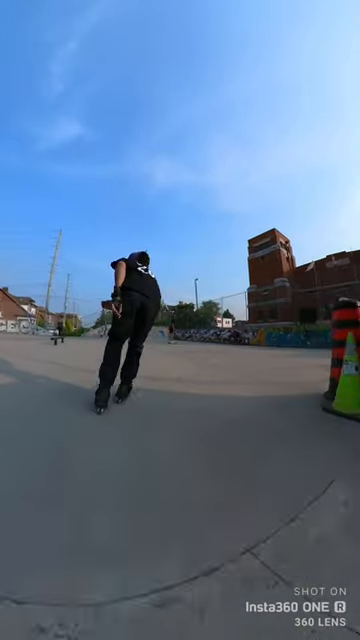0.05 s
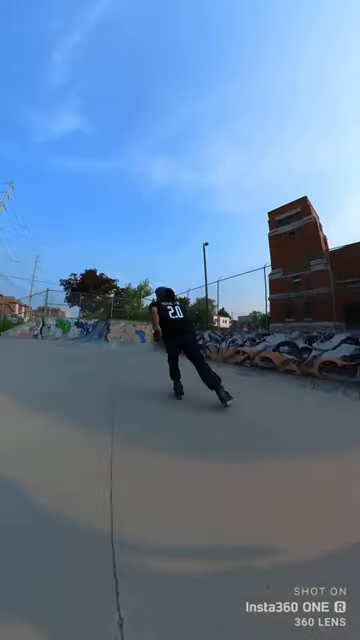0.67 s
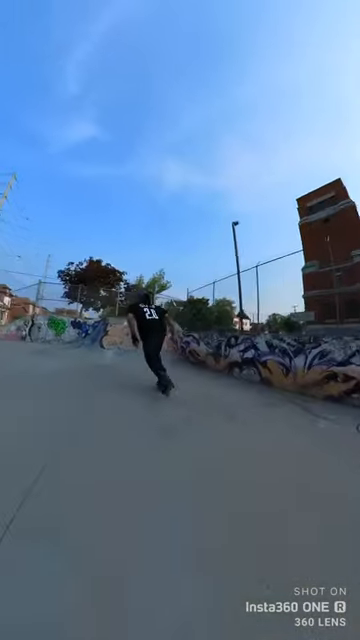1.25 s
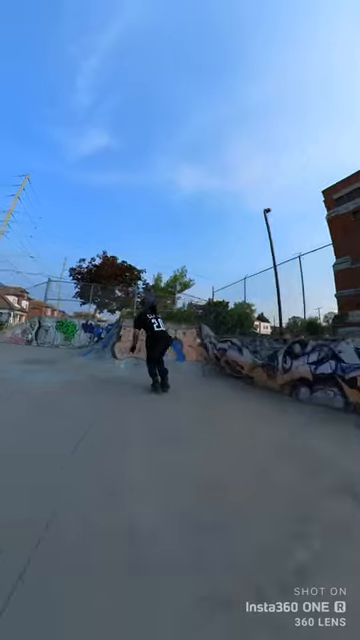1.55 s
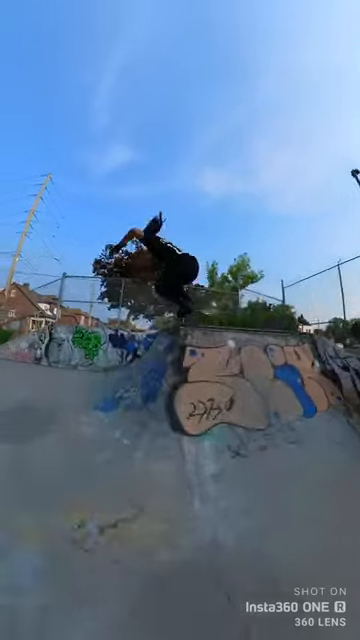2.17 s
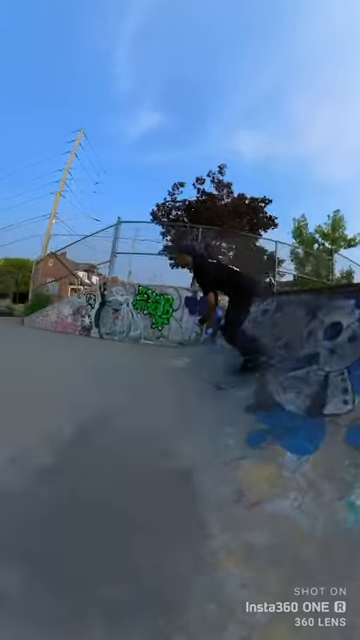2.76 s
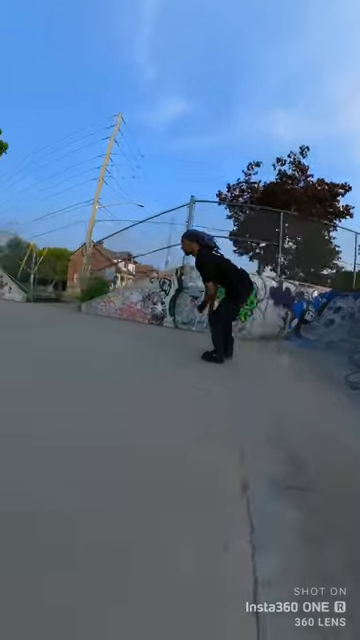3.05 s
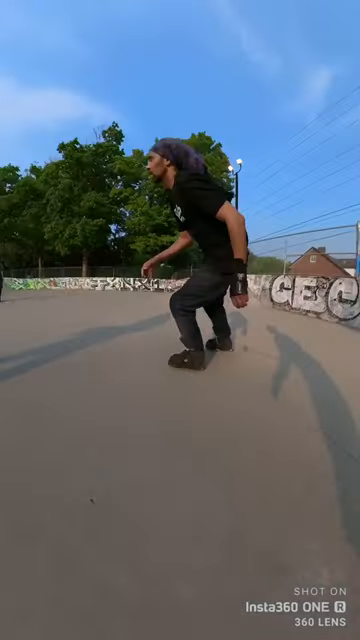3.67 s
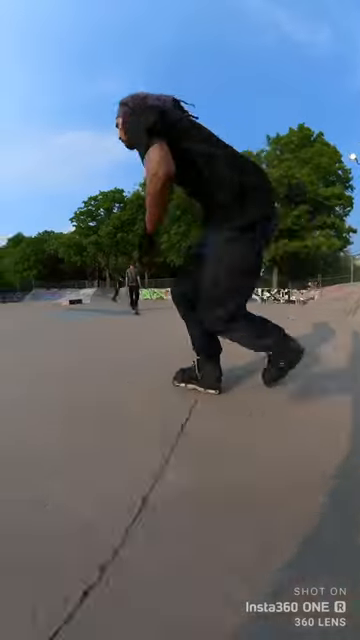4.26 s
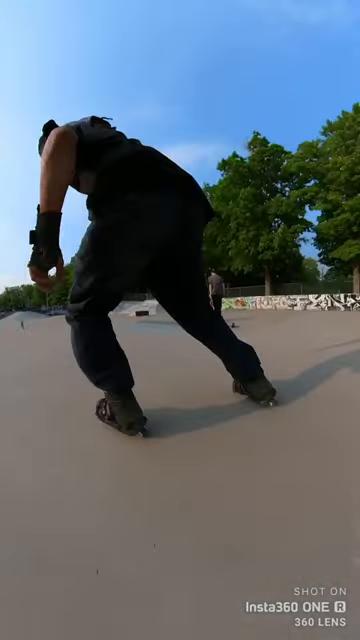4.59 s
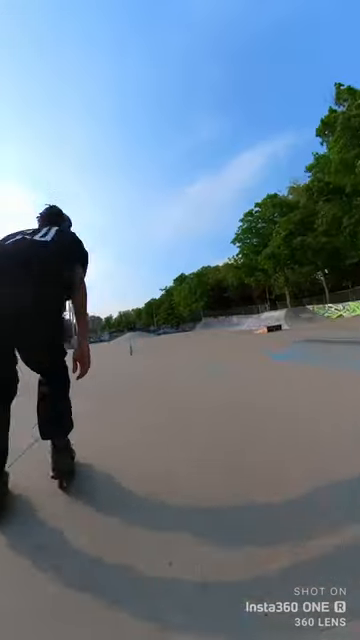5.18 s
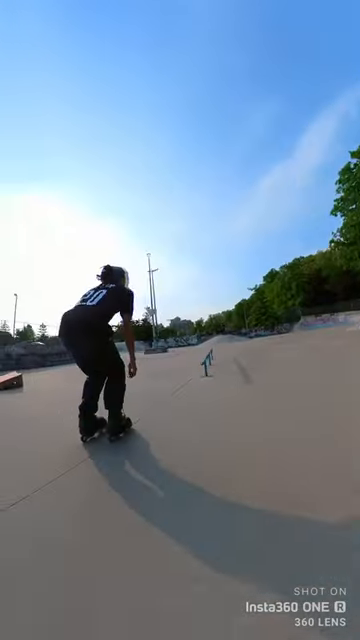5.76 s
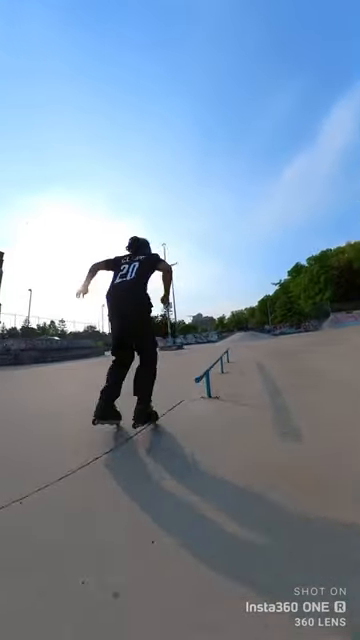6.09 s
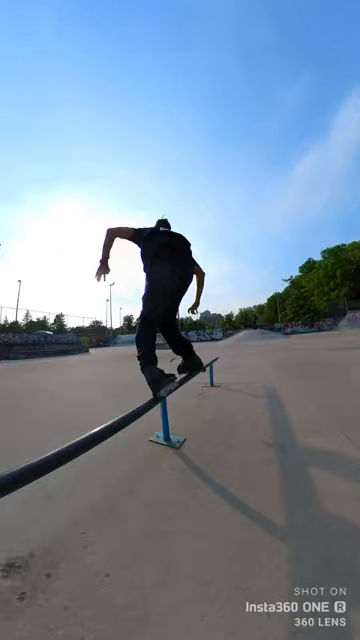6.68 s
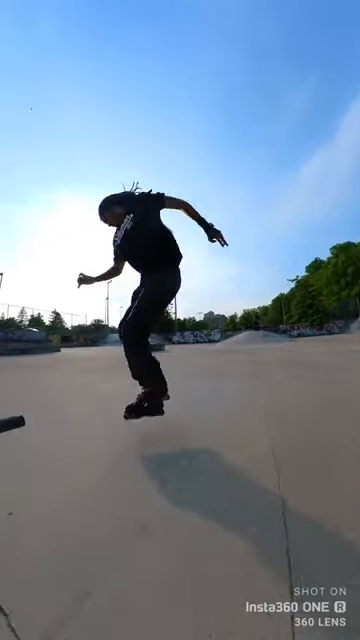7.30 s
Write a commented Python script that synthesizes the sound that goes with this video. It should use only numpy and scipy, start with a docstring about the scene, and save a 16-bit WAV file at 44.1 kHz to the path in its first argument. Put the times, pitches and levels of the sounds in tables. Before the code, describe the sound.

Low gusts of wind rumble on a close, following microphone while inline skates rush across an outdoor concrete park. The muffled rolling is broken by a few knocks and a rattling landing, then opens into a brighter hiss with several pushes. A knock starts a short, ringing grind on a metal rail, and another ends it as the wheels return to the concrete.

```python
"""Inline skate wheels rush over the grit of a concrete skatepark, close ahead of a following camera.
The skater jumps a bank, lands with a clack of frames, pushes past and grinds a steel rail,
which rings as the plastic sole sticks and slips. Wind buffets the camera throughout.
Midway the camera switches from a shielded, dull microphone to an open, bright one."""
import sys
import numpy as np
from scipy import signal
from scipy.fft import rfft, irfft, next_fast_len
from scipy.io import wavfile
from scipy.ndimage import uniform_filter1d

SR = 44100
rng = np.random.default_rng(int(sys.argv[2]) if len(sys.argv) > 2 else 0)


def bounce(signal):
    """Save signal as a 16-bit WAV file at the path given by the first command-line argument."""
    frames = np.transpose(np.atleast_2d(signal))
    limited = np.clip(frames, -1, 1)
    pcm = np.round(limited * 32767).astype(np.int16)
    wavfile.write(sys.argv[1], SR, pcm)


N = 332514
T = np.arange(N) / SR
MIC_SWITCH_S = 3.652  # from the shielded microphone to the open one
RAIL_ON_S, RAIL_OFF_S = 6.539, 7.294

# skate spectrum at the shielded and at the open microphone: frequency_hz, gain_db
SKATES_SHIELDED = [(120, 3.5), (350, 7.5), (700, 5.5), (1200, 1), (1600, -1), (2200, -1.5), (2800, -7),
                   (4000, -10.5), (5500, -23), (7500, -32.5), (9000, -31), (10400, -37), (12200, -21.5),
                   (14500, -14.5)]
SKATES_OPEN = [(200, -3), (700, 2), (1200, 0), (1800, 1.5), (2300, 1), (2700, -1), (4000, -1), (5000, -5.5),
               (7000, -8.5), (10500, -6.5), (12500, 1), (15500, -6)]


def wheels():
    """Wheels roll on patchy concrete: dull at the shielded microphone, then bright at the open one."""
    # rolling to the bank and down from it: time_s, rush_db, hiss_db
    approach = [(0, -48.5, -56), (.14, -53, -69.5), (.42, -53.5, -63.5), (.435, -54.5, -73), (.6, -53, -70),
                (.78, -51, -65), (1.27, -52.5, -65.5), (1.42, -51, -59.5), (1.88, -49, -60.5),
                (2.08, -51.5, -63), (2.3, -51.5, -58.5), (3.05, -47.5, -57.5), (3.5, -48, -61.5),
                (3.63, -59, -70.5)]
    # the skater's weight on one skate: start_s, length_s, rush_db, hiss_db
    strides = [(3.665, 0.26, -49, -52), (4.112, 0.087, -43.5, -45), (4.22, 0.33, -52, -50),
               (4.665, 0.14, -48, -48), (5.04, 0.27, -55, -60), (5.275, 0.06, -47, -51),
               (5.36, .04, -52.5, -50.5), (5.5, 0.65, -54.5, -53.5), (6.195, 0.017, -53, -76),
               (7.29, 0.07, -49, -56)]
    # the rolling sound dips briefly under wind gusts: start_s, length_s, dip_db
    dips = [(3.933, 0.026, -2), (4.827, 0.1, -8.5), (6.23, 0.1, -5.5)]
    # skate resonances: centre_hz, width_hz, boost_db
    modes = [(1200, 360, 3.5), (1910, 260, 3.5), (2380, 73, 4.5), (4000, 400, 1)]
    texture = grit(per_s=700, spread_db=-0.5, share=0.39)
    dull = contact(texture, curve(approach), SKATES_SHIELDED, modes, trim_db=(0, -0.5), split_hz=2730)
    load = loading(strides, idle_db=(-56.5, -60.5), attack_s=0.046, release_s=0.038)
    texture = grit(per_s=1200, spread_db=2.5, share=0.58)
    bright = contact(texture, load, SKATES_OPEN, modes, trim_db=(-1, 1.5), split_hz=6400)
    switched = np.clip((T - MIC_SWITCH_S) / 0.024 + 1, 0, 1)
    lingering = np.clip((MIC_SWITCH_S + 0.47 - T) / 0.1, 0, 1)  # the dull roar outlasts the switch
    on_concrete = 1 - window(RAIL_ON_S, RAIL_OFF_S, edge_s=0.0056)
    rolling = dull * lingering + bright * switched * on_concrete
    dip_db = sum(db * hold(s, length, attack_s=0.0073, release_s=0.029) for s, length, db in dips)
    return wander(rolling, depth_db=1.58, rate_hz=9) * undb(dip_db + walk(70))


def grind():
    """The plastic sole sticks and slips along the steel rail and rings it."""
    # the sole bears down: start_s, length_s, rush_db, hiss_db
    slides = [(6.556, 0.044, -44.5, -38.5), (6.645, 0.12, -48, -48), (6.8, 0.046, -48.5, -48.5),
              (6.96, 0.41, -51, -55)]
    # spectrum of plastic on steel: frequency_hz, gain_db
    sole = [(300, 13), (1000, 10.5), (2200, 12.5), (4000, 3), (5200, -2), (7000, -3.5), (10500, -1.5),
            (13000, 5), (15500, -2.5)]
    # rail resonances: centre_hz, width_hz, boost_db
    modes = [(2410, 50, 3.3), (3030, 70, 6), (3260, 120, 6.5), (4000, 480, 5.2), (6750, 800, 4.6)]
    slips = grit(per_s=800, spread_db=0, share=0.72)
    load = loading(slides, idle_db=(-57.5, -53), attack_s=0.023, release_s=0.021)
    scrape = contact(slips, load, sole, modes, trim_db=(-0.5, -0.5), split_hz=5200)
    scrape *= undb(0.9 * walk(80))
    return wander(scrape, depth_db=2.6, rate_hz=31) * window(RAIL_ON_S, RAIL_OFF_S, edge_s=0.0032)


def grit(per_s, spread_db, share):
    """A smooth rush mixed with the clicks of single grains."""
    size = next_fast_len(N)
    clicks = (rng.random(size) < per_s / SR) * rng.choice([-1, 1], size)
    grain_gain = undb(spread_db * np.minimum(rng.exponential(size=size), 5))
    return unit(rng.standard_normal(size) + share * unit(clicks * grain_gain))


def loading(pushes, idle_db, attack_s, release_s):
    """Rush and hiss in dB: each push bites, eases while held, then leaves the skate briefly unloaded."""
    sag_db, settle_s = -4.5, 0.018
    unload_db, recover_s = -2, 0.12
    power, slack_db = 0, 0
    for start, length, *db in pushes:
        age, after = np.maximum(T - start, 0), np.maximum(T - start - length, 0)
        eased = undb(sag_db * (1 - np.exp(-age / settle_s)))
        power += np.outer(undb(db), hold(start, length, attack_s, release_s) * eased) ** 2
        slack_db += unload_db * (after > 0) * np.exp(-after / recover_s)
    return 10 * np.log10(power + np.outer(undb(idle_db), undb(slack_db)) ** 2)


def contact(texture, levels_db, spectrum, modes, trim_db, split_hz, low_cut_hz=70):
    """Surface texture shakes the skate: a low rush and a fine hiss, each with its own level and trim."""
    f = freqs(texture)
    gain = colour(f, spectrum, modes) / (1 + (low_cut_hz / f) ** 4)
    high = 1 / (1 + (split_hz / f) ** 6)
    level_bands_hz = [(1800, 4500), (11500, 15500)]  # where the rush and hiss levels apply
    out = 0
    for part, (lo, hi), db, trim in zip((1 - high, high), level_bands_hz, levels_db, trim_db):
        band_rms = np.sqrt(np.mean(gain ** 2 * (f > lo) * (f < hi)))
        out += shape(texture, gain * part / band_rms)[:N] * undb(db + trim)
    return out


def wander(x, depth_db, rate_hz):
    """Quarter-octave bands swell and fade on their own as the skate leans and its load shifts."""
    spectrum = rfft(x)
    place = np.clip(4 * np.log2(freqs(x) / 300), 0, 22)
    bands = (irfft(spectrum * np.maximum(1 - np.abs(place - k), 0), N) for k in range(23))
    return sum(band * undb(depth_db * walk(rate_hz)) for band in bands)


def knocks(crack_db=4.5, crack_s=0.0015, boot_hz=393, boot_width_hz=740):
    """Each blow is a crack and a rattle of wheels, frame and hollow boot, with a tail from the ramps."""
    # skates strike concrete or rail: time_s, attack_db, t60_s, tilt_db_per_octave, boot_db
    blows = [(0.791, -39.5, 0.17, -1.5, -16), (1.485, -30, 0.25, -9, -18), (2.704, -31, .025, 0, 7),
             (2.7123, -27.5, 0.033, 2.5, 7), (2.7209, -25.5, 0.036, -.5, -2), (2.729, -23.5, 0.04, 2, 4),
             (2.7444, -27, 0.038, 2.5, 7), (4.443, -40.5, 0.052, -1, 4), (4.492, -46, 0.052, 3.5, -5),
             (4.584, -34.5, 0.026, 1, 27.5), (4.71, -41, 0.073, 1, -5), (4.883, -36.5, 0.064, -14, -2),
             (4.95, -37.5, 0.025, -8, -1), (6.262, -41.5, 0.04, -9.5, -4), (6.539, -32, 0.12, 1.5, 8),
             (6.646, -34.5, 0.046, 0.5, -23), (7.023, -39.5, 0.23, -3.5, -11), (7.294, -34, 0.066, 0.1, 6)]
    # frame resonances: centre_hz, width_hz, boost_db
    frame_modes = [(980, 65, 6.5), (1426, 120, 4.3), (2510, 170, 7.1), (3300, 730, 1.9), (5400, 2200, 2.7),
                   (7740, 3200, 4.3)]
    out, t = np.zeros(N + SR), np.arange(8192) / SR
    f = freqs(t)
    lead, attack = 128, int(.008 * SR)  # samples
    ramp_tail = undb(-28 - 60 * t / .2)
    for s, db, t60, tilt, boot_db in blows:
        ring = undb(crack_db * np.exp(-t / crack_s) - 60 * t / t60) * np.minimum(t / .0008, 1)
        modes = [*frame_modes, (boot_hz, boot_width_hz, boot_db)]
        gain = colour(f, SKATES_SHIELDED if s < MIC_SWITCH_S else SKATES_OPEN, modes)
        gain *= undb(tilt * np.log2(np.maximum(f, 500) / 1000))
        rattle = np.roll(rng.standard_normal(len(t)) * (ring + ramp_tail), lead)
        blow = shape(rattle, gain / (1 + (140 / f) ** 2))
        i = int(s * SR) - lead
        out[i:i + len(t)] += undb(db) * blow / np.std(blow[lead:lead + attack])
    return out[:N]


def squeals(pitch_jitter=0.012, rough_db=4.5):
    """For a moment the scraping gathers on one resonance; uneven slipping makes it hoarse."""
    # a pushing wheel or the sole on the rail sings: start_s, length_s, pitch_hz, level_db
    slips = [(0.32, 0.09, 1110, -49), (6.659, .105, 2366, -54), (7.115, 0.06, 6950, -56)]
    out = 0
    for start, length, hz, db in slips:
        phase = 2 * np.pi * np.cumsum(hz * (1 + pitch_jitter * walk(900))) / SR
        gate = window(start, start + length, edge_s=0.025)
        out += np.sin(phase) * undb(db + rough_db * walk(220)) * gate
    return out


def tick(time_s=3.504, peak_db=-28.5, band_hz=(1800, 9700)):
    """One thin, dry click."""
    impulse = signal.unit_impulse(N, int(time_s * SR))
    click = signal.sosfilt(signal.butter(4, band_hz, "band", fs=SR, output="sos"), impulse)
    return undb(peak_db) * click / np.abs(click).max()


def wind(gust_trim_db=1):
    """Air flutters low over the microphones, with gusts breaking through."""
    # steady air stream: time_s, level_db
    breeze = [(.17, -54.5), (.32, -40), (.52, -57.5), (.75, -46.5), (1.45, -39.5), (1.63, -52.5),
              (2.17, -28), (2.43, -47), (2.8, -45.5), (3.1, -36.5), (4.08, -41), (4.55, -39.5),
              (5.0, -44.5), (5.27, -48), (5.6, -41), (6.15, -38), (6.4, -34), (6.6, -43.5), (6.8, -36),
              (7.2, -40), (7.28, -37.5), (7.54, -33)]
    # gusts on the microphone: start_s, length_s, level_db, corner_hz
    gusts = [(0.577, 0.036, -33, 286), (0.737, 0.029, -20.5, 393), (0.778, 0.031, -27.5, 420),
             (1.017, 0.056, -33.5, 246), (1.145, 0.016, -29, 280), (1.195, 0.062, -30, 412),
             (1.277, 0.02, -22, 423), (1.388, 0.015, -27, 384), (1.719, 0.28, -34, 384),
             (1.813, 0.017, -27.5, 540), (1.942, 0.026, -30.5, 530), (1.975, 0.032, -22.5, 400),
             (1.997, 0.13, -25.5, 394), (2.238, 0.0302, -24.5, 430), (3.498, 0.023, -31, 483),
             (3.53, 0.03, -19, 387), (3.555, .065, -19.5, 510), (3.613, 0.042, -24.5, 626),
             (3.657, 0.079, -32.5, 400), (3.729, 0.15, -39, 680), (3.877, 0.033, -25, 447),
             (3.919, 0.123, -23.5, 240), (4.048, 0.013, -26.5, 480), (4.821, 0.029, -26, 173),
             (4.866, 0.072, -27.5, 190), (4.996, 0.03, -28, 185), (5.072, 0.076, -29.5, 224),
             (5.349, 0.1, -28.5, 248), (5.972, 0.02, -38.5, 402), (6.144, 0.075, -31, 467),
             (6.192, 0.055, -33, 820), (6.257, 0.017, -31, 764), (6.419, 0.022, -30.5, 270),
             (6.732, 0.15, -35, 380), (6.863, 0.05, -30.5, 694), (6.955, 0.25, -33, 422),
             (7.359, 0.069, -30.5, 345), (7.419, 0.048, -32, 565), (7.475, .09, -31, 590)]
    # response of the shielded and the open microphone to wind pressure: frequency_hz, gain_db
    shielded_port = [(42, -89), (70, -6), (130, 4), (260, 4), (500, 3)]
    open_port = [(40, -22.5), (80, 7), (120, 10.5), (180, 7), (270, 0.5), (500, 1)]
    size = next_fast_len(N)
    shielded = eddies(size, corner_hz=195, port=shielded_port, patchy_db=1)[:N]
    exposed = eddies(size, corner_hz=184, port=open_port, patchy_db=3.5)[:N]
    stream = np.where(T < MIC_SWITCH_S, shielded, exposed) * undb(curve(breeze)[0] + 3.2 * walk(40))
    out = np.pad(stream, (0, SR))
    t = np.arange(32768) / SR - .2  # starts early to hold the swell
    for start, length, db, corner_hz in gusts:
        port = shielded_port if start < MIC_SWITCH_S else open_port
        i = int((start + t[0]) * SR)
        out[i:i + len(t)] += undb(db + gust_trim_db) * gust(t, length, corner_hz, port)
    return out[:N]


def gust(t, length, corner_hz, port):
    """Softer, duller air swells, the gust breaks in hard, sags as it passes and leaves a wake."""
    attack_s, sag_s = 0.0055, 0.21 * length
    bite_db, bite_s = 4.5, 0.018
    swell_db, lead_s, wake_s = -11, 0.016, 0.075
    gate = ramp(t, attack_s) * ramp(length - t, sag_s)
    bite = undb(bite_db * np.exp(-np.maximum(t, 0) / bite_s))
    burst = fill_lulls(eddies(len(t), corner_hz, port, patchy_db=5.5)) * gate * bite
    burst /= np.sqrt(np.sum(burst ** 2) / np.sum(gate ** 2))
    around = np.exp(np.minimum(t, 0) / lead_s - np.maximum(t - length, 0) / wake_s)
    swell = undb(swell_db) * around * eddies(len(t), 0.63 * corner_hz, port, patchy_db=4)
    return hold_down(burst + swell, ceiling=1.64)


def eddies(size, corner_hz, port, patchy_db):
    """Turbulent pressure at the microphone: ragged bursts, falling above a corner set by air speed."""
    pressure = rng.standard_normal(size) * undb(patchy_db * walk(130, size))
    f = freqs(pressure)
    fall = (1 + (f / corner_hz) ** 4) * (1 + (f / (2 * corner_hz)) ** 4)
    return unit(shape(pressure, colour(f, port, []) / np.sqrt(fall)))


def fill_lulls(x, span_s=0.017, fullness=0.55):
    """A gust blows without gaps: even out its eddies, leaving their fine raggedness."""
    power = uniform_filter1d(np.abs(signal.hilbert(x)) ** 2, int(span_s * SR))
    return x / np.sqrt(power) ** fullness


def wind_limiter(air):
    """The camera holds wind peaks under a ceiling that rises briefly after the switch, then drops."""
    # highest swing allowed: time_s, level_db
    ceiling = [(3.65, -15), (4.0, -8), (4.3, -22)]
    return hold_down(air, undb(curve(ceiling)[0]))


def ducking(air, strength=0.1, knee_db=-39, above_hz=320, span_s=0.06):
    """Gain on the skates, lowered while wind is loud on the open microphone."""
    buffeting = shape(air, 1 / (1 + (above_hz / freqs(air)) ** 4)) * (T > MIC_SWITCH_S)
    power = np.abs(uniform_filter1d(buffeting ** 2, int(span_s * SR)))
    return (1 + power / undb(knee_db) ** 2) ** -strength


def hold_down(x, ceiling):
    """Press the strongest swings softly down to a common height."""
    envelope = np.abs(signal.hilbert(x, next_fast_len(len(x))))[:len(x)]
    swing = uniform_filter1d(envelope, size=200)
    return x / (1 + (swing / ceiling) ** 4) ** (1 / 4)


def undb(db):
    """Decibels to gain."""
    return 10 ** (np.asarray(db) / 20)


def unit(x):
    """Scale to rms 1."""
    return x / np.sqrt(np.mean(x ** 2))


def curve(rows):
    """Each column of a time table, joined by straight lines."""
    times, *columns = np.transpose(rows)
    return [np.interp(T, times, column) for column in columns]


def freqs(x):
    """The frequency of each spectral bin of x, at least 1 Hz."""
    return np.maximum(np.fft.rfftfreq(len(x), 1 / SR), 1)


def shape(x, gain):
    """Filter by a gain per spectral bin."""
    return irfft(rfft(x) * gain, len(x))


def colour(f, spectrum, modes):
    """Gain of a broad spectrum with resonances standing on it."""
    hz, db = np.transpose(spectrum)
    peaks_db = sum(boost / (1 + (2 * (f - centre) / width) ** 2) for centre, width, boost in modes)
    return undb(np.interp(np.log(f), np.log(hz), db) + peaks_db)


def walk(rate_hz, size=N):
    """Smooth random drift with a spread near 1."""
    knots = rng.standard_normal(4096)
    return 1.2 * np.interp(np.arange(size) * rate_hz / SR, np.arange(len(knots)), knots)


def ramp(t, edge_s):
    """A slope from 0 to 1, centred on t = 0."""
    return np.clip(t / edge_s + .5, 0, 1)


def window(start, end, edge_s):
    """1 between start and end, with sloping edges."""
    return ramp(np.minimum(T - start, end - T), edge_s)


def hold(start, length, attack_s, release_s):
    """Rise, hold, then die away."""
    return ramp(T - start, attack_s) * np.exp(-np.maximum(T - start - length, 0) / release_s)


def scene():
    """Skates and wind in mono, from close behind the skater."""
    air = wind_limiter(wind())
    skates = (wheels() + grind()) * ducking(air)
    return (skates + squeals() + knocks() + tick() + air)[None]


def record(dry):
    """The camera cuts the highest treble."""
    top_hz = 15750
    return signal.sosfilt(signal.ellip(10, .2, 80, top_hz, fs=SR, output="sos"), dry)


dry = scene()
out = record(dry)
bounce(out)
```